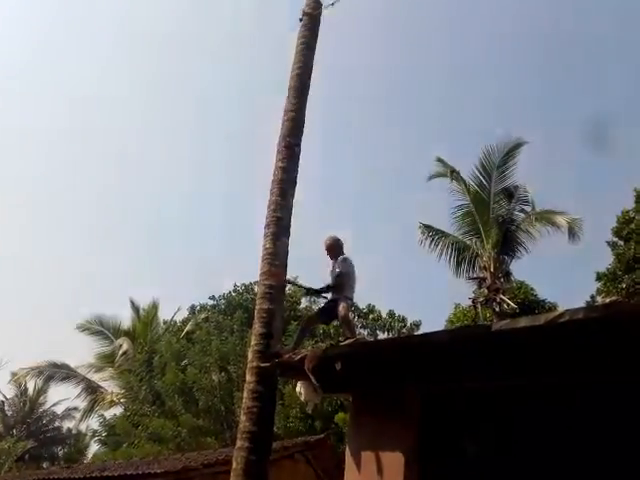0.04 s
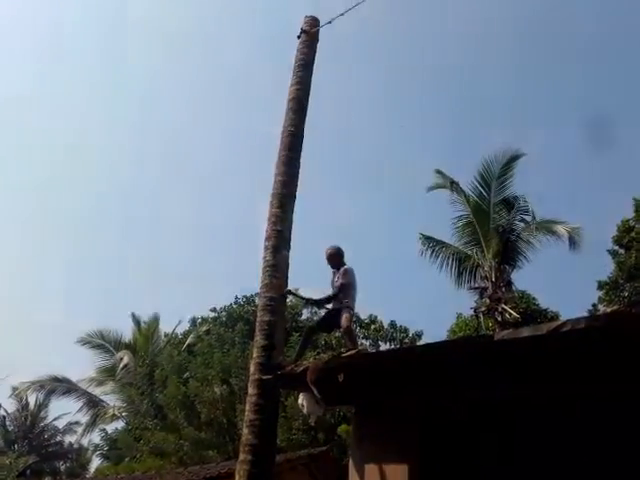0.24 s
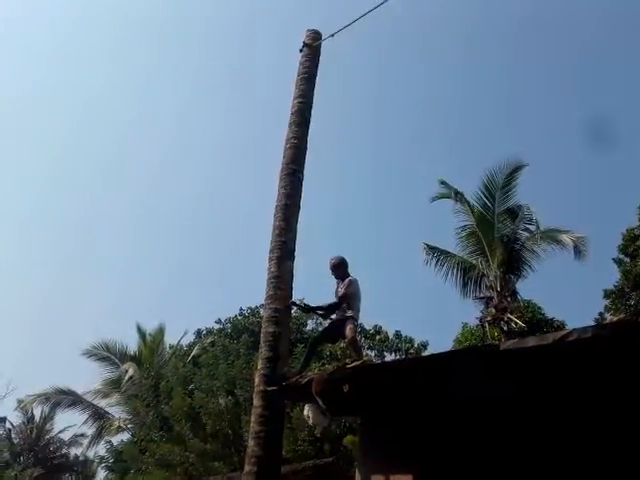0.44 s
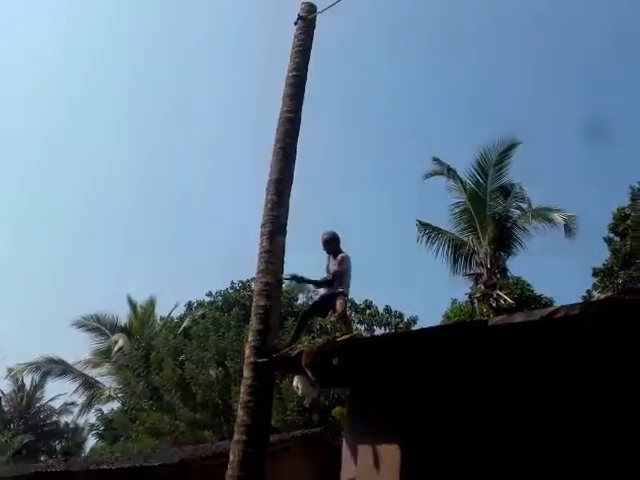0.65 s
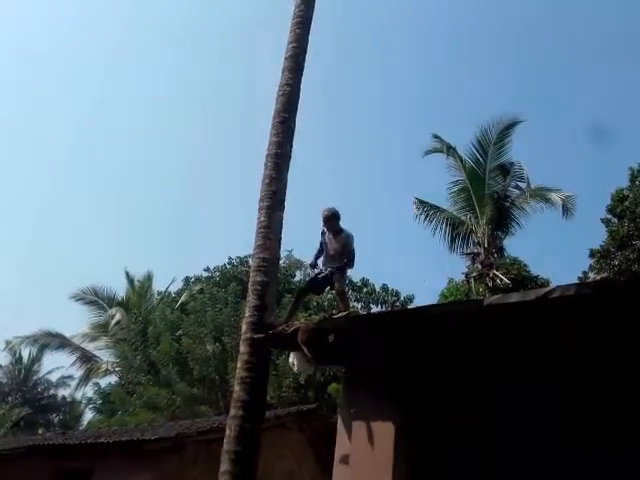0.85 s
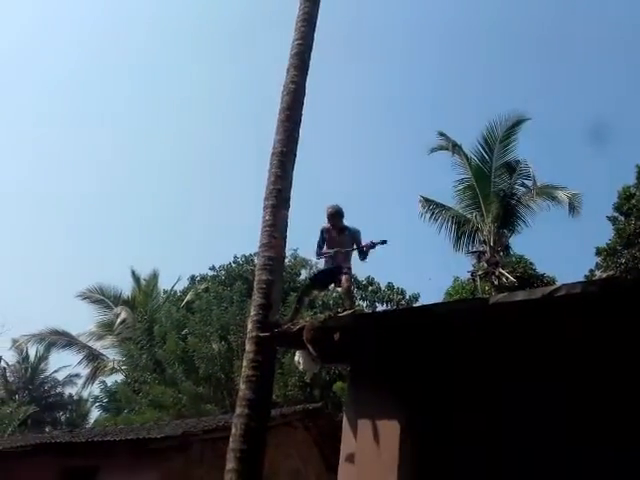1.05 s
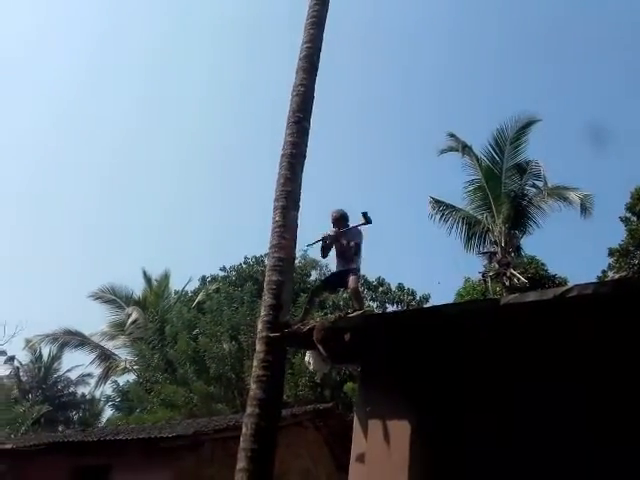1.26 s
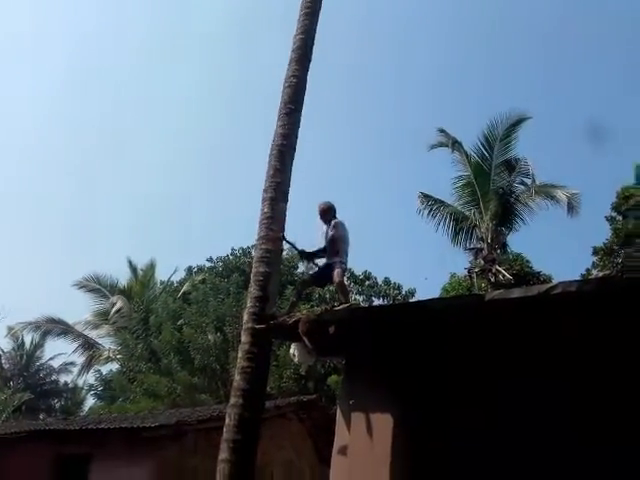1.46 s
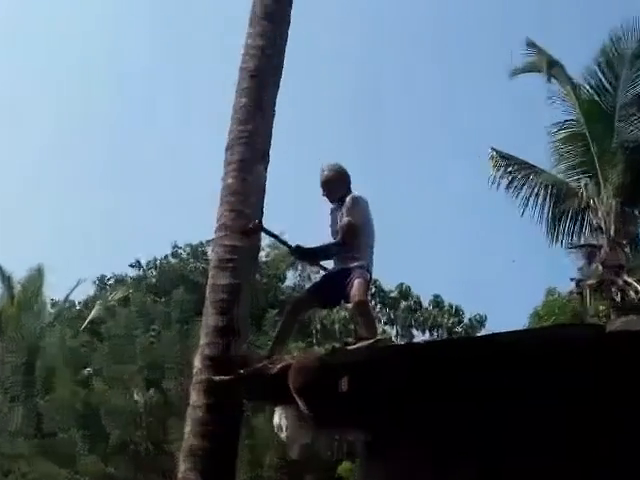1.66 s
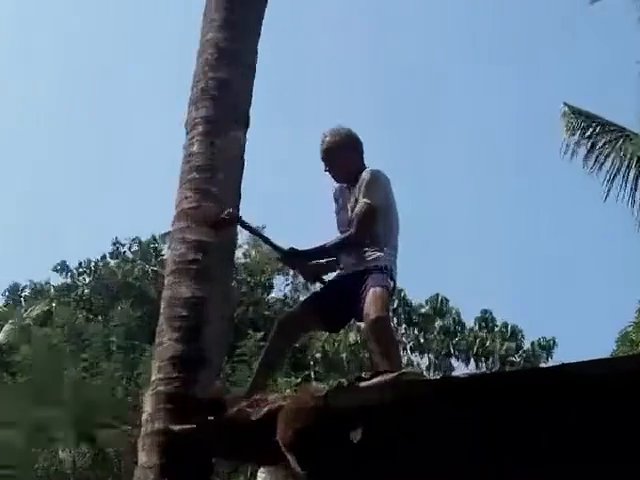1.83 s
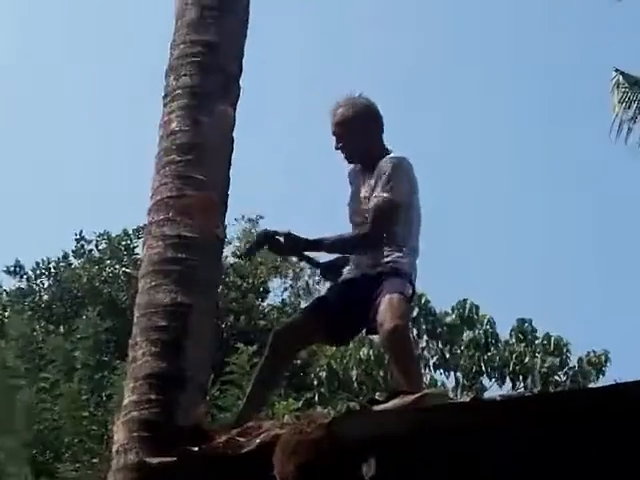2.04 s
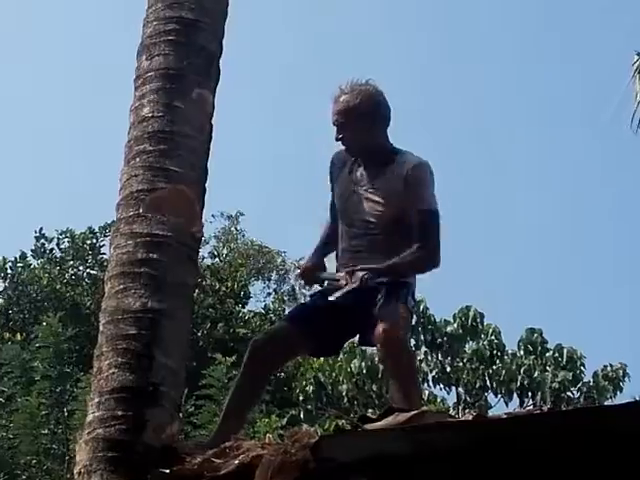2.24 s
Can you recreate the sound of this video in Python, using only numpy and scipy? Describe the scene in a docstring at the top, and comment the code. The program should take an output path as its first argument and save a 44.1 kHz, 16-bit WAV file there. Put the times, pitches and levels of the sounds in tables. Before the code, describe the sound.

An axe chops twice into a palm trunk outdoors, with light wind behind.

```python
"""A roof over a yard: a man chops twice into a palm trunk, some metres from a hand-held camera. Each stroke
cracks the bark, crunches through fibre and stops with a thud. Walls throw the thud back; trunk and yard ring. A
soft rush swells with a hollow note over a faint hum. The hand bumps, rubs and ticks on the camera."""
import sys
import numpy as np
from scipy import signal
from scipy.fft import rfft, irfft
from scipy.io import wavfile
from scipy.ndimage import uniform_filter1d

SR = 44100
rng = np.random.default_rng(int(sys.argv[2]) if len(sys.argv) > 2 else 0)


def to_wav(sig):
    """Store sig (one row per channel, or 1-D mono) as 16-bit WAV at the path in sys.argv[1].

    Samples outside -1..1 are clipped; the rate is SR.
    """
    pcm = np.clip(np.atleast_2d(sig), -1, 1) * 32767
    pcm = np.round(pcm).astype(np.int16)
    wavfile.write(sys.argv[1], SR, pcm.T)  # frames by channels


N = 105840
TIME_S = np.arange(N) / SR

# Axe strokes; leads count back from the thud (thud time [s], thud [dB], crunch [dB], crack [dB],
# crack lead [s], crunch lead [s], split [dB], split lead [s], thud send [dB], crunch send [dB])
CHOPS = [(0.2087, -5.5, -17.5, -16, .0083, .0102, -13, .0052, 0, 0),
         (1.5393, -5.5, -16.5, -23.5, 0.0082, .0062, -13.5, .0046, -1.5, -1.5)]
# Blade stopping, one spectrum per chop (frequency [Hz], relative level [dB])
THUD_SPECTRA = [
    [(30, -39.5), (100, -28.5), (250, -7), (460, 1.5), (650, -4.5), (880, -7), (1060, 2), (1320, -10.5),
     (1660, -6), (2300, -34), (5000, -36), (16000, -53)],
    [(30, -44), (100, -16.5), (280, -4), (430, -13), (600, -3), (790, 4), (1100, -6.5), (1500, -10),
     (2000, -28), (3300, -38), (5000, -42), (16000, -55)],
]
# Fibre giving way, per chop (frequency [Hz], relative level [dB])
CRUNCH_SPECTRA = [
    [(50, -48), (300, -4), (1100, 0.5), (1750, -4), (2300, -19.5), (3600, -18.5), (4900, -15), (6800, -32),
     (9500, -23.5), (16000, -37)],
    [(50, -25), (300, -14.5), (900, 9), (1500, -6), (2500, -14.5), (3800, -16), (5200, -37), (7000, -37),
     (12000, -34), (16000, -30)],
]
# Bark cracking, per chop (frequency [Hz], relative level [dB])
CRACK_SPECTRA = [
    [(300, -17), (2000, 13), (4800, -14), (6800, -3), (9300, 3.5), (10800, -3.5), (12500, -2.5),
     (16000, -4.5)],
    [(300, 1), (2000, 8.5), (4000, -4), (5500, -10.5), (8000, -13), (11500, -1.5), (14000, -7),
     (16000, -12)],
]
# Roof and wall echoes (delay [s], gain [dB], low-pass cutoff [Hz])
WALL_ECHOES = [(0.0115, -15.5, 2500), (0.0144, -12.5, 1400), (.0179, -1, 540), (.0525, -20, 1300),
               (.072, -18.5, 1100)]
# Trunk and yard modes (frequency [Hz], relative level [dB], T60 [s])
RING_MODES = [(221, 2, .3), (279, 3, .26), (338, 0, .27), (392, -2, .25), (442, 1, .22), (505, 1, .24),
              (556, -3, .25), (636, -3, .26), (739, -4, .25), (800, -2, .24), (888, -5, .24),
              (984, -2, .37), (1051, -4, .3), (1172, -2, .3), (1468, -2, .28), (1641, -2, .26)]
# Yard reverb colour (frequency [Hz], gain [dB])
YARD_EQ = [(60, -10), (150, 2.5), (300, 5), (600, -3), (1000, -1), (1800, 3.5), (3000, 2.5), (5500, 1),
           (9500, 1), (16000, 1)]
# Yard reverb decay (frequency [Hz], T60 [s])
YARD_DECAY = [(100, 0.35), (400, 0.39), (1000, 0.49), (2500, 0.33), (7000, 0.37), (16000, 0.27)]

# Background rush (time [s], level [dB])
RUSH_ENVELOPE = [(0, -47.5), (.19, -49), (.45, -47), (.7, -45.5), (.82, -43), (.9, -47.5), (1.0, -44),
                 (1.13, -40.5), (1.19, -44.5), (1.25, -40), (1.33, -45), (1.46, -43.5), (1.5, -44.5),
                 (1.62, -53.5), (1.74, -62.5), (1.98, -67.5), (2.4, -71.5)]
# Background rush (frequency [Hz], relative level [dB])
RUSH_SPECTRUM = [(30, -36.5), (90, -20), (140, -6.5), (350, -3.5), (650, -0.5), (1200, -1.5), (1520, 0.5),
                 (2000, -5), (3000, -4.5), (4200, -22), (6500, -53), (16000, -40)]
# Side notes in the rush (frequency [Hz], half-width [Hz], level re rush [dB])
RUSH_NOTES = [(366.5, 22, -11.5), (544, 45, -15), (869, 10, -20.5), (308, 3.3, -17)]
# Fine hiss (time [s], level [dB])
HISS_ENVELOPE = [(0, -57.5), (.19, -54), (.5, -54.5), (.62, -54), (.76, -52.5), (.83, -52.5), (.89, -64),
                 (1.05, -60.5), (1.19, -57), (1.24, -49.5), (1.34, -54), (1.46, -54.5), (1.49, -60.5),
                 (1.6, -69), (1.75, -81), (2.4, -90)]
# Fine hiss (frequency [Hz], relative level [dB])
HISS_SPECTRUM = [(1000, -14), (3000, 11), (4500, 8.5), (6000, -1.5), (7200, -6), (8700, -2.5),
                 (11000, -3.5), (15500, -5), (16400, -36)]
# Main hollow note (time [s], level [dB])
MOAN_ENVELOPE = [(0, -56), (.45, -52), (.62, -57.5), (.85, -53), (1.0, -52), (1.14, -41), (1.2, -45),
                 (1.35, -52.5), (1.5, -57), (1.75, -60), (2.0, -90)]
# Main hollow note (frequency [Hz], half-width [Hz], relative level [dB])
MOAN_NOTES = [(781.7, 26, 1), (813, 6.5, -4)]

# Soft hand bumps (time [s], level [dB], decay [s], rub level [dB])
BUMPS = [(.531, -38.5, 0.0087, -41.5), (1.176, -42, 0.003, -56), (1.383, -31.5, 0.0064, -55),
         (1.452, -40, 0.0085, -56), (1.517, -32.5, 0.0092, -59)]
# Hand bump (frequency [Hz], relative level [dB])
BUMP_SPECTRUM = [(40, -38), (100, -29), (170, -8.5), (290, 2), (410, 0.5), (560, 1.5), (900, -12),
                 (2500, -16), (6000, -33.5), (15000, -34.5)]
# Hand rubs (time [s], level [dB], rise [s], decay [s])
RUBS = [(1.765, -43.5, 0.04, 0.034), (1.857, -50, 0.008, 0.029), (1.905, -51.5, 0.023, 0.02)]
# Hand friction (frequency [Hz], relative level [dB])
RUB_SPECTRUM = [(60, -17), (300, 0), (720, 2.5), (1100, -6), (2000, 1.5), (2800, -9.5), (4500, -21.5),
                (7000, -23), (11000, -19), (15600, -19), (16500, -38)]
# Sharp ticks (time [s], body [dB], treble [dB])
TICKS = [(1.4760, -56, -39.5), (1.5035, -26, -43), (1.5285, -17, -20.5), (1.8097, -41, -43),
         (1.8168, -39, -57), (1.8396, -44, -52), (1.8655, -47, -54), (1.9099, -47, -44),
         (1.9186, -45.5, -44), (1.9238, -42.5, -38.5)]
# Tick body (frequency [Hz], relative level [dB])
TICK_BODY_SPECTRUM = [(60, -11), (400, -16), (1200, 2), (2600, 0), (5000, -13), (16000, -41.5)]
# Tick treble (frequency [Hz], relative level [dB])
TICK_TREBLE_SPECTRUM = [(500, -35), (5000, -17), (8000, -6), (12500, 3), (16000, -6)]

# Still air (frequency [Hz], relative level [dB])
AIR_SPECTRUM = [(25, -26), (50, -4), (90, -9), (150, -2.5), (280, -4), (450, -3), (750, -2.5), (1300, -8),
                (2400, -16), (3400, -29.5), (4600, -27.5), (7000, -30.5), (10000, -23.5), (15700, -21.5),
                (16500, -42)]
# Faint hum (time [s], level [dB])
HUM_ENVELOPE = [(0, -72), (.45, -71), (.6, -62.5), (1.1, -61.5), (1.4, -67), (1.95, -70), (2.15, -73.5),
                (2.4, -74)]
# Brief faint tones (time [s], length [s], frequency [Hz], level [dB])
TONES = [(.64, 0.03, 377, -45), (.80, 0.085, 458, -43), (1.94, 0.025, 1147, -55), (2.22, 0.081, 442, -59.5)]
# Microphone bass loss (frequency [Hz], gain [dB])
MIC_EQ = [(100, -3), (135, 0)]

CRACK_RISE_S, CRACK_HOLD_S, CRACK_FALL_S = 0.00076, 0.00098, 0.00065
CRUNCH_RISE_S, CRUNCH_FALL_S, SNAPS_PER_S = 0.0014, 0.0011, 5000
YARD_THUD_DB, YARD_CRACK_DB, YARD_BUILD_S, RING_PEAK_GAIN_DB = -13, -7, 0.0044, 9
BUMP_RISE_S, BUMP_HOLD_S = 0.00096, 0.0014
RUB_SLIPS_PER_S, RUB_SPREAD_DB, RUB_GRIT_DB = 570, 7.5, -7
AIR_DB, HUM_HZ, HUM_HALF_WIDTH_HZ, HUM_WAVER = -61.5, 122, 4, 0.4
MIC_CUTOFF_HZ = 16300


def axe():
    """The edge cracks bark, crunches and splits fibre, stops with a thud; the yard answers."""
    cut, thud, thud_send, crunch_send, crack_send = np.zeros((5, N))
    for chop, low, mid, top in zip(CHOPS, THUD_SPECTRA, CRUNCH_SPECTRA, CRACK_SPECTRA):
        (at_s, thud_db, crunch_db, crack_db, crack_lead_s, crunch_lead_s,
         split_db, split_lead_s, thud_send_db, crunch_send_db) = chop
        crack = burst(top, CRACK_RISE_S, CRACK_HOLD_S, CRACK_FALL_S)
        crunch = burst(mid, CRUNCH_RISE_S, crunch_lead_s - CRUNCH_RISE_S, CRUNCH_FALL_S)
        add(cut, at_s - crack_lead_s, amp(crack_db) * crack)
        add(cut, at_s - crunch_lead_s, amp(crunch_db) * crunch)
        add(cut, at_s - split_lead_s, amp(split_db) * click(mid))
        add(thud, at_s, amp(thud_db) * click(low))
        # One click per stage excites the yard.
        add(thud_send, at_s, amp(thud_db + thud_send_db) * click(low))
        add(crunch_send, at_s - split_lead_s, amp(crunch_db + crunch_send_db) * click(mid))
        add(crack_send, at_s - crack_lead_s, amp(crack_db + YARD_CRACK_DB) * click(top))
    reverb = amp(YARD_THUD_DB) * yard(thud_send) + yard(crunch_send) + yard(crack_send)
    return cut + thud + wall_echoes(thud) + ringing(thud_send) + reverb


def wall_echoes(thud):
    """Roof and walls return delayed, dulled copies."""
    out = np.zeros(N)
    for delay_s, db, cutoff_hz in WALL_ECHOES:
        dulled = signal.lfilter(*signal.butter(2, cutoff_hz, fs=SR), thud)
        add(out, delay_s, amp(db) * dulled)
    return out


def ringing(thud):
    """Damped modes of trunk and yard, driven by the thud."""
    t = TIME_S[:SR]
    modes = sum(amp(db - 60 * t / t60_s) * np.sin(2 * np.pi * hz * t) for hz, db, t60_s in RING_MODES)
    modes /= abs(rfft(modes)).max()
    onset = 1 - np.exp(-t / YARD_BUILD_S)
    return convolve(thud, amp(RING_PEAK_GAIN_DB) * onset * modes)


def yard(send):
    """Scattered reflections, each band dying at its own rate."""
    hz, frame_s, bands = signal.stft(rng.choice([-1., 1.], SR), SR, nperseg=256)
    decay = amp(-60 * frame_s / log_interp(YARD_DECAY, hz)[:, None])
    tail = signal.istft(bands * decay, SR, nperseg=256)[1][:SR]
    tail *= 1 - np.exp(-(TIME_S[:SR] / YARD_BUILD_S) ** 2)
    return convolve(send, convolve(unit_energy(tail), impulse(YARD_EQ)))


def rushing():
    """Swelling rush with hollow notes and fine hiss."""
    rush = drifting_noise(RUSH_SPECTRUM, patchy_db=0.5, flicker_db=1.5)
    rush += sum(amp(db) * resonance(hz, half_width_hz) for hz, half_width_hz, db in RUSH_NOTES)
    hiss = drifting_noise(HISS_SPECTRUM, patchy_db=2.0, flicker_db=1.3)
    moan = sum(amp(db) * resonance(hz, half_width_hz) for hz, half_width_hz, db in MOAN_NOTES)
    return gain(RUSH_ENVELOPE) * rush + gain(HISS_ENVELOPE) * hiss + gain(MOAN_ENVELOPE) * moan


def handling():
    """Hand bumps, rubs and ticks right at the microphone; no echo."""
    out = np.zeros(N)
    for at_s, db, fall_s, rub_db in BUMPS:
        add(out, at_s, amp(db) * burst(BUMP_SPECTRUM, BUMP_RISE_S, BUMP_HOLD_S, fall_s))
        add(out, at_s, amp(rub_db) * rub(BUMP_HOLD_S, fall_s))
    for at_s, db, rise_s, fall_s in RUBS:
        add(out, at_s, amp(db) * rub(rise_s, fall_s))
    for at_s, body_db, treble_db in TICKS:
        add(out, at_s, amp(body_db) * click(TICK_BODY_SPECTRUM))
        add(out, at_s, amp(treble_db) * click(TICK_TREBLE_SPECTRUM))
    return out


def rub(rise_s, fall_s):
    """Short scrape: smooth friction plus uneven slips."""
    n = SR // 4
    slips = amp(RUB_SPREAD_DB * np.minimum(rng.exponential(1, n), 2))
    slips *= rng.random(n) < RUB_SLIPS_PER_S / SR
    friction = rng.standard_normal(n) + amp(RUB_GRIT_DB) * unit_rms(slips)
    return shaped(friction, RUB_SPECTRUM, rise_s, 0, fall_s)


def background():
    """Still air, a wavering hum, a few brief tones."""
    hum = np.sqrt(2) * np.sin(2 * np.pi * HUM_HZ * TIME_S)
    hum += HUM_WAVER * resonance(HUM_HZ, HUM_HALF_WIDTH_HZ)
    air = drifting_noise(AIR_SPECTRUM, patchy_db=1.5, flicker_db=1.2)
    out = amp(AIR_DB) * air + gain(HUM_ENVELOPE) * hum
    for at_s, length_s, hz, db in TONES:
        t = np.arange(0, length_s, 1 / SR)
        add(out, at_s, amp(db) * np.sin(np.pi * t / length_s) * np.sin(2 * np.pi * hz * t))
    return out


def burst(spectrum, rise_s, hold_s, fall_s):
    """Short noise burst studded with tiny snaps."""
    n = SR // 4
    mean_gap = round(SR / SNAPS_PER_S)
    signs = rng.choice([-1., 1.], n)
    snaps = rng.random(n) < 1 / mean_gap
    return shaped(signs * (0.5 + snaps), spectrum, rise_s, hold_s, fall_s)


def shaped(x, spectrum, rise_s, hold_s, fall_s):
    """Linear rise, hold, exponential fall; then coloured."""
    t = TIME_S[:len(x)]
    envelope = np.minimum(t / rise_s, 1) * np.exp(-np.maximum(t - rise_s - hold_s, 0) / fall_s)
    return convolve(unit_rms(x) * envelope, unit_energy(impulse(spectrum)))


def click(spectrum):
    """Click with the energy of 1 ms at full level."""
    return unit_energy(impulse(spectrum)) * np.sqrt(SR / 1000)


def impulse(spectrum, size=4096):
    """Minimum-phase impulse response."""
    hz = abs(np.fft.fftfreq(size, 1 / SR))
    log_gain = np.log(amp(log_interp(spectrum, hz)))
    response = np.exp(np.conj(signal.hilbert(log_gain)))
    return np.fft.ifft(response).real[:size // 2]


def drifting_noise(spectrum, patchy_db, flicker_db):
    """Coloured noise with drifting patches and a flicker common to all bands."""
    bands = signal.stft(rng.standard_normal(N), SR, nperseg=512, noverlap=384)[2]
    patches = uniform_filter1d(rng.standard_normal(bands.shape), size=7, axis=0)
    patches = unit_rms(uniform_filter1d(patches, size=14, axis=1))
    flicker = unit_rms(uniform_filter1d(rng.standard_normal(bands.shape[1]), size=6))
    bands *= amp(patchy_db * patches + flicker_db * flicker)
    noise = signal.istft(bands, SR, nperseg=512, noverlap=384)[1][:N]
    colour = amp(log_interp(spectrum, np.fft.rfftfreq(N, 1 / SR)))
    return unit_rms(irfft(rfft(noise) * colour, N))


def resonance(hz, half_width_hz):
    """Noise in one narrow band."""
    detuning = (np.fft.rfftfreq(N, 1 / SR) - hz) / half_width_hz
    return unit_rms(irfft(rfft(rng.standard_normal(N)) / (1 + detuning ** 2), N))


def log_interp(points, hz):
    table_hz, values = np.transpose(points)
    return np.interp(np.log(hz + 1), np.log(table_hz), values)


def gain(envelope):
    return amp(np.interp(TIME_S, *np.transpose(envelope)))


def amp(db):
    return 10 ** (np.asarray(db) / 20)


def unit_rms(x):
    return x / np.sqrt(np.mean(x ** 2) + 1e-20)


def unit_energy(x):
    return x / np.linalg.norm(x)


def convolve(x, response):
    return signal.fftconvolve(x, response)[:N]


def add(mix, at_s, sound):
    part = mix[round(at_s * SR):][:len(sound)]
    part += sound[:len(part)]


def scene():
    """Mono mix."""
    return (axe() + rushing() + background() + handling())[None]


def record(dry):
    """The microphone thins the bass and limits the band."""
    thinned = convolve(dry[0], impulse(MIC_EQ))
    lowpass = signal.firwin(255, MIC_CUTOFF_HZ, window=("kaiser", 9), fs=SR)
    return signal.oaconvolve(thinned, lowpass, "same")[None]


dry = scene()
out = record(dry)
to_wav(out)
```